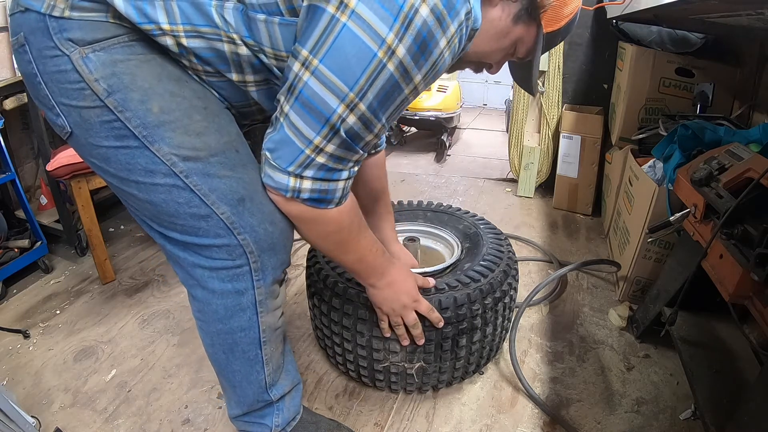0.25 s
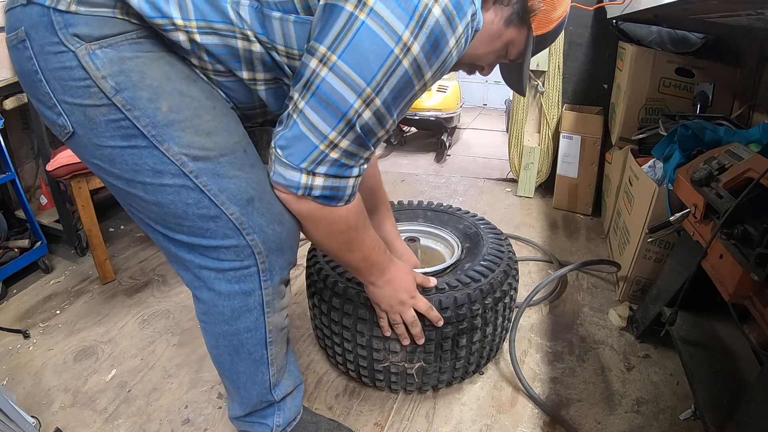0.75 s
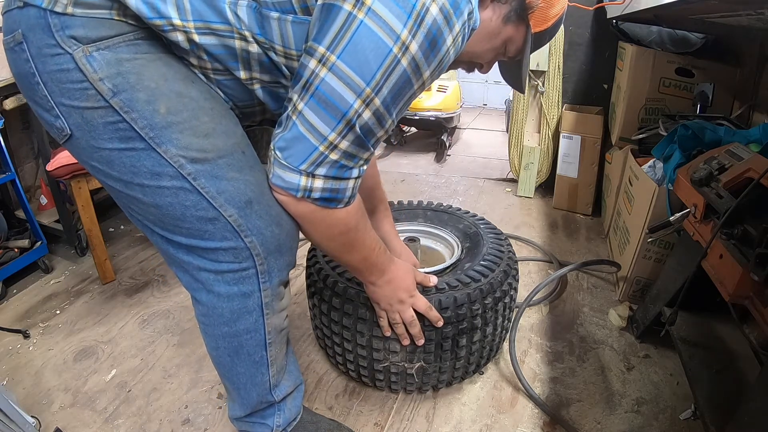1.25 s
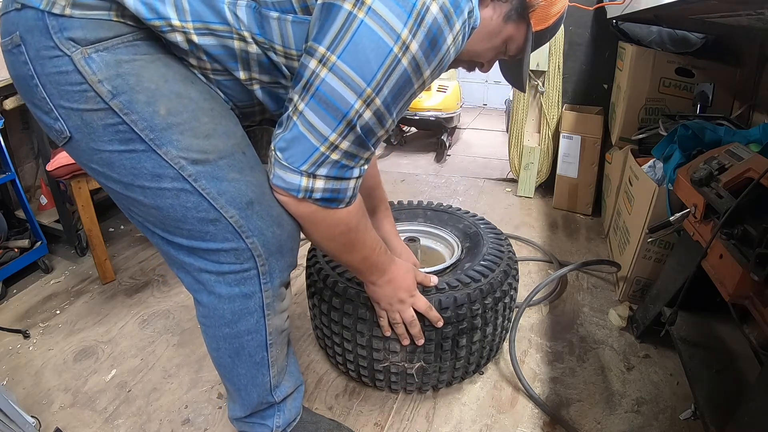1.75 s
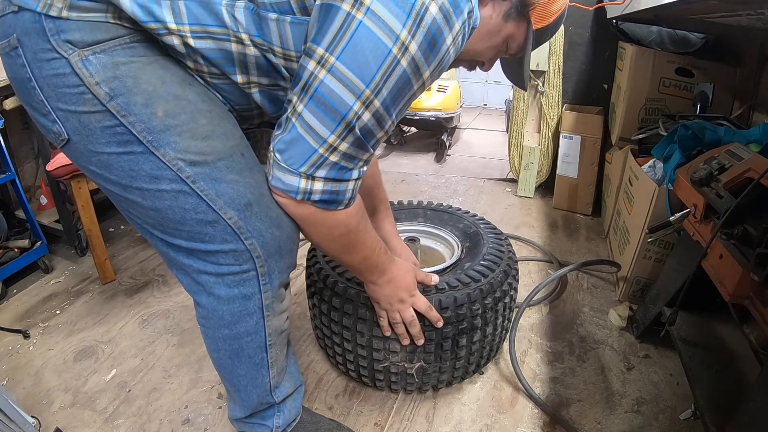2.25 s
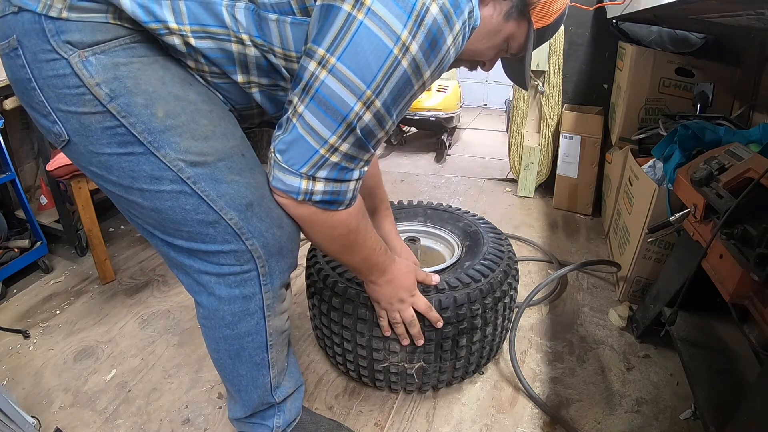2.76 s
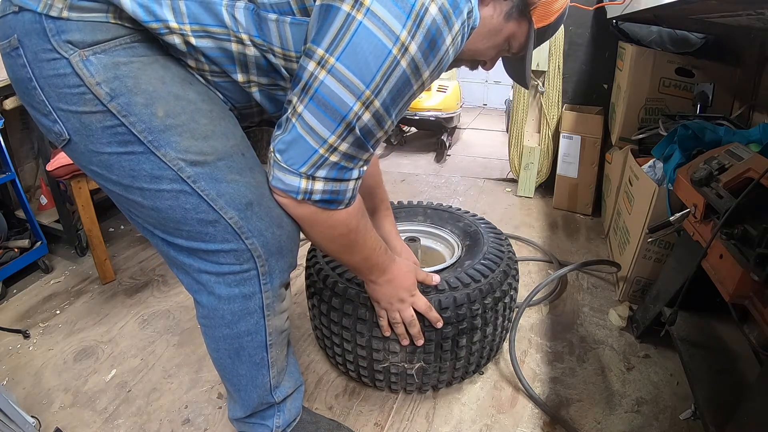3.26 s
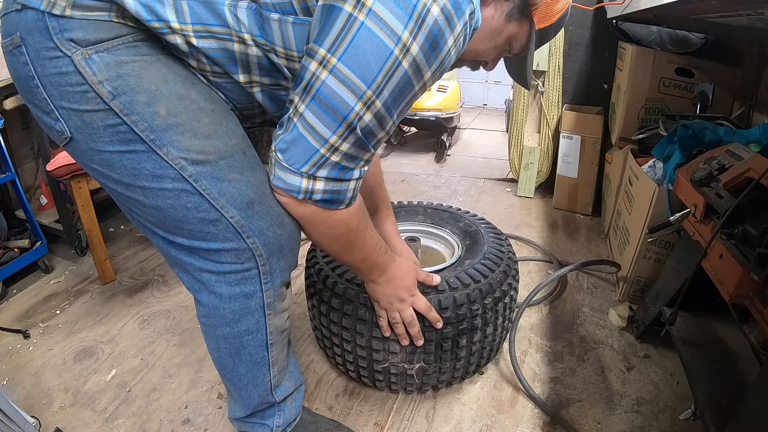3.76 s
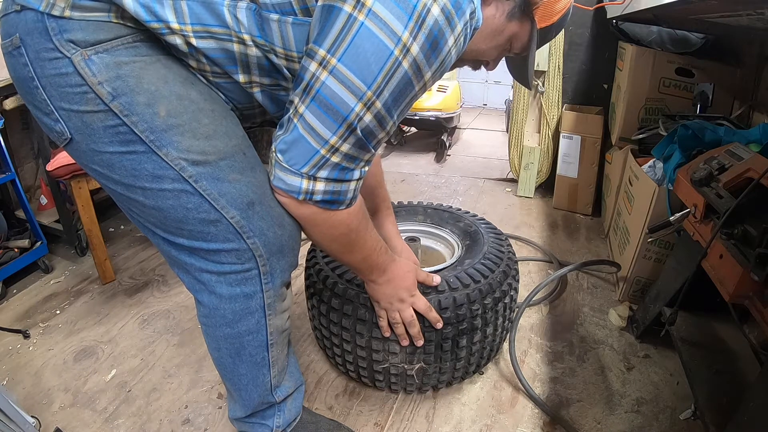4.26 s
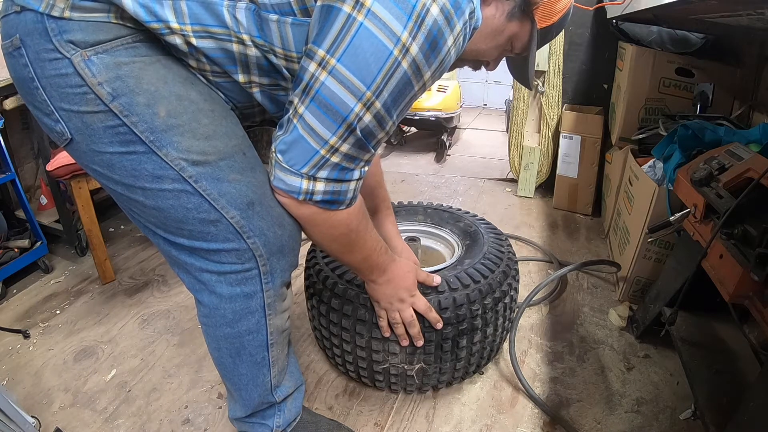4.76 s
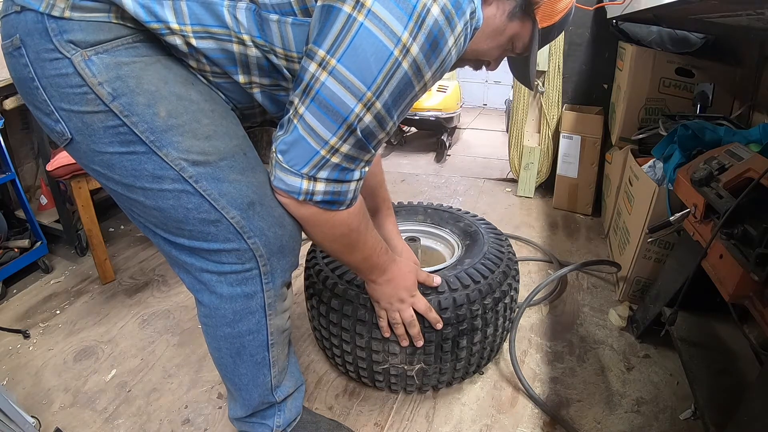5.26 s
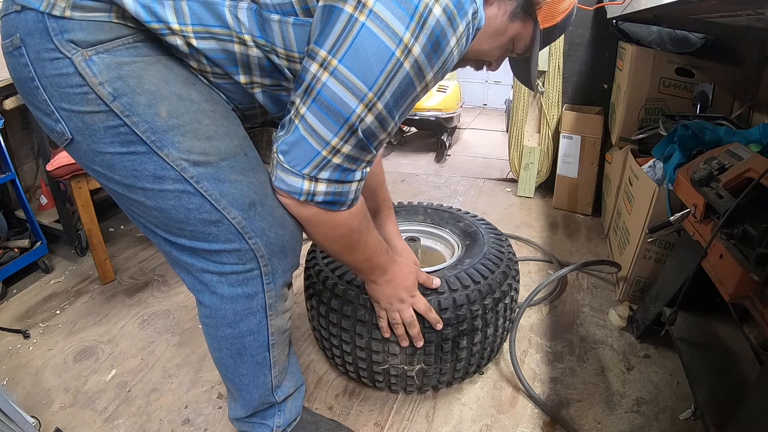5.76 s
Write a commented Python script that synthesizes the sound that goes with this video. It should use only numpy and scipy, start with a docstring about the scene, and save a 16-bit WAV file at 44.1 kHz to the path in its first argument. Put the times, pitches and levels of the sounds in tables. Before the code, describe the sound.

Low, buzzing compressor chug with a rough airy escape and breathy whistles that die away in steps, leaving fine valve hiss and steady motor hum.

```python
"""A compressor drone fills the garage, with a broad rush of air that dies away in steps and a hiss on the right.
The piston at the back gives steady overtones; their scatter rumbles in the room's resonances, with panel and fan.
Air runs through a hose into a small tyre: filtered noise makes the valve hiss, the escaping air and breathy notes.
Soft knocks, decaying sines, come as the tyre seals. Two close microphone ports hear it all."""
import sys
import numpy as np
from scipy import signal
from scipy.fft import rfft, irfft, next_fast_len
from scipy.io import wavfile
from scipy.ndimage import uniform_filter1d

SR = 44100
rng = np.random.default_rng(int(sys.argv[2]) if len(sys.argv) > 2 else 0)


def dump_mix(stems):
    """Bounce the given channels to the path in sys.argv[1] as a 16-bit WAV at rate SR."""
    frames = np.atleast_2d(stems).T  # one column per channel
    limited = np.clip(frames, -1, 1)  # hard clip at full scale
    pcm = np.round(limited * 32767).astype(np.int16)
    wavfile.write(sys.argv[1], SR, pcm)


N = 264996
SIZE = next_fast_len(N, True)
TIME = np.arange(N) / SR
HZ = np.fft.rfftfreq(SIZE, 1 / SR) + 1e-3  # the offset keeps logarithms finite


def compressor():
    """Piston strokes, their rumble in the garage, a ringing panel and the fan sound together."""
    return strokes() + rumble() + panel() + fan()


# Drifting speed of the piston: start_s, strokes_per_s
SHAFT_SPEED = [(0, 31.5), (1.9, 31.48), (3.7, 31.58), (4.5, 31.55), (4.9, 31.48), (6.01, 31.52)]


def crank():
    """Crank angle in radians, the running sum of the shaft speed."""
    start_rad = 3.1
    return start_rad + 2 * np.pi * np.cumsum(curve(SHAFT_SPEED)[0]) / SR


# Overtones of the piston at the ports: multiple_of_stroke_rate, left_level_db, right_level_db
STROKE_OVERTONES = [(1, -29.5, -30.5), (2, -36.7, -32.2), (3, -42.9, -52.9), (4, -58.1, -43.1),
                    (5, -30.6, -31.5), (6, -48.2, -49.0), (7, -44.4, -44.5), (8, -38.2, -37.1),
                    (9, -47.1, -46.2), (10, -61.9, -56.2), (11, -65.7, -59.6), (12, -57.2, -52.3),
                    (13, -64.1, -58.0), (15, -66, -64.5), (16, -68, -59.0), (17, -67, -66),
                    (18, -71.4, -62.2), (19, -58.5, -58.6), (20, -69.7, -66.3), (21, -56.5, -55.0),
                    (22, -64.2, -60.8)]


def strokes():
    """Steady overtones of the piston; higher ones arrive later through intake and room."""
    lag_rad = 1.771  # per multiple squared
    swing_hz, swing_width_hz, swing_rad = 209, 28, 1.9  # overtones near a garage resonance run ahead
    waver_db = .4  # slow unevenness of each overtone
    mean_rate = curve(SHAFT_SPEED)[0].mean()
    turn, out = crank(), 0
    for multiple, left_db, right_db in STROKE_OVERTONES:
        hz = multiple * mean_rate
        left_lead = on_hz(PORT_PAIR, hz)[0]
        swing = swing_rad * np.exp(-((hz - swing_hz) / swing_width_hz) ** 2)
        phase = multiple * turn - lag_rad * multiple ** 2 + swing
        tone = np.cos(phase + np.array([[left_lead], [0]]))
        level = np.sqrt(2) * undb([[left_db], [right_db]])  # rms to peak
        out = out + level * undb(waver_db * walk(3.23)) * tone
    return out


# Garage resonances: pitch_hz, width_hz, level_db (per Hz), left_minus_right_db
GARAGE_MODES = [(36, 15, -53.5, 1), (70.8, 10.4, -52, -3.5), (101, 11.6, -58.5, 8), (134.5, 19, -56.5, 1.5),
                (173, 14, -67, 3), (189, 13, -63, 4), (204.4, 7.3, -61, 2), (218.6, 8.8, -56.5, 6.5),
                (240, 15, -70, 4), (262.2, 8.5, -65, -3), (276.1, 9.3, -58.5, -3.5), (302, 21, -69, -11.5),
                (328, 12, -73.5, -15), (339, 26, -63.5, -4.5), (353, 9.8, -62, -2.5),
                (376.7, 8.1, -57.5, -2), (388.2, 11, -58, -4), (410.5, 10.6, -57, 2.5),
                (439.3, 6.2, -59.5, -2), (456, 8.8, -58.5, -1), (489, 4.7, -66, -6),
                (508.4, 3.2, -57.5, -1.5), (538, 23, -69, -2.5), (565, 15, -75, -7.5)]


def rumble():
    """The uneven part of the strokes, as noise in the garage's resonances."""
    return noise(power(modes=GARAGE_MODES)) * undb(.5 * walk(6))


# Modes of the ringing panel: pitch_hz, width_hz, relative_level_db, left_minus_right_db
PANEL_MODES = [(648, 10, -9, 2), (661, 8, -2, 2), (678, 9, -5, -1), (688, 7, 2, -1), (706, 8, 5, -2),
               (727, 8, 1, -2), (748, 24, -5.5, -2.2), (772, 22, -12, -2), (821, 10, -11, -2)]


def panel():
    """Noise through the casing's modes; the ring swells and dips at random."""
    level_db, waver_db, hold_s = -52.5, .5, .2
    ring = steady(unit(noise(power(modes=PANEL_MODES))), hold_s)
    return ring * undb(level_db + waver_db * walk(4.3))


# Motor and fan noise: pitch_hz, level_db (per Hz)
FAN_SPECTRUM = [(250, -103), (520, -67.5), (900, -81), (1400, -86), (2500, -99), (4000, -106), (5000, -101),
                (8000, -104), (16000, -125)]
# Resonances of the fan shroud: pitch_hz, width_hz, level_db (per Hz)
SHROUD_MODES = [(888, 25, -79), (1008, 20, -77), (1362, 12, -77), (1540, 27, -81), (2150, 66, -86),
                (2420, 30, -86), (3210, 50, -92), (3460, 120, -94), (3920, 80, -94)]


def fan():
    """Broad motor and fan noise with the shroud's resonances on top."""
    return noise(power(FAN_SPECTRUM, SHROUD_MODES)) * undb(1.1 * walk(9))


# Colour of the escaping air: pitch_hz, relative_level_db (per Hz)
RUSH_SPECTRUM = [(700, -5), (1100, -5.5), (2000, -9.5), (3500, -14.5), (4200, -22), (6000, -16.5),
                 (8000, -17.5), (10000, -21), (13000, -28.5), (16000, -38)]
# Levels of the jet as the gap at the rim closes: start_s, low_level_db, middle_level_db, high_level_db
GAP_STEPS = [(0, -47.5, -53.5, -54), (.22, -46, -56.5, -53.5), (.55, -50, -65.5, -56),
             (1.85, -53.5, -73, -57), (2.7, -55.5, -71, -67)]


def rush():
    """Air escaping at the rim in three noise bands; the upper two lean right."""
    split_hz, pan_share = (4140, 4560), .86  # this wider source is shaded less than the valve
    step_s = .17  # time scale of each glide between levels
    low_db, middle_db, high_db = steps(GAP_STEPS, step_s)
    over_low, over_high = (1 / (1 + (hz / HZ) ** 8) for hz in split_hz)
    leaning = power(RUSH_SPECTRUM, pan_db=pan_share * on_hz(LEFT_SHADE)[0])
    low = unit(noise(power(RUSH_SPECTRUM) * (1 - over_low)))
    middle = unit(noise(leaning * over_low * (1 - over_high)))
    high = unit(noise(leaning * over_high))
    low = low * undb(low_db + .9 * walk(14))
    middle = middle * undb(middle_db + 1.7 * walk(8.3))
    high = high * undb(high_db + .42 * walk(17))
    return low + middle + high


# Resonances of chuck and valve stem: pitch_hz, width_hz, relative_level_db
STEM_MODES = [(4310, 60, -12), (4430, 60, -15), (5415, 60, -3), (5510, 40, -9), (6060, 40, -3),
              (6280, 90, -1), (6710, 110, 0), (6900, 21, -1), (7320, 60, 1), (7570, 99, -2), (7890, 50, -6),
              (8600, 170, -8), (9480, 52, -12), (10400, 220, -17), (11900, 400, -15), (12700, 68, -15),
              (13200, 57, -23)]
# Smooth hiss under the resonances: pitch_hz, relative_level_db (per Hz)
HISS_BED = [(3500, -47), (5000, -20), (5800, -4), (6500, -27), (7100, 1), (7850, 0.5), (8250, -10.5),
            (9500, -10.5), (11200, -37), (12200, -49), (14000, -53), (16000, -57)]
# Shading of the left port: pitch_hz, left_minus_right_db
LEFT_SHADE = [(4000, -5), (4700, -11), (5400, -11), (6200, -12), (6900, -12), (7300, -6), (7850, -3),
              (8200, -8), (10000, -7), (12000, -5), (14000, -2)]
# A stem resonance that comes up as the tyre fills: pitch_hz, width_hz, relative_level_db
LATE_STEM_MODE = (4690, 72, -8)
# Its rise: start_s, relative_level_db
LATE_STEM_STEPS = [(0, -7), (3.4, 0)]


def valve():
    """Air squeezing through chuck and stem hisses on fixed bands, each swelling alone, to the right."""
    level_db, start_db, build_s = -53, -1.5, .81  # the hiss builds up as the leak lessens
    ring_db, patchy_db = 5, 1.1  # resonances over the bed, and their swelling
    late_step_s = .5
    white, pan_db = ports(), on_hz(LEFT_SHADE)[0]
    hiss = noise(power(HISS_BED, pan_db=pan_db))
    for mode in STEM_MODES:
        ring = noise(power(modes=[mode], pan_db=pan_db), white)
        hiss = hiss + ring * undb(ring_db + patchy_db * walk(3.2))
    late_ring = noise(power(modes=[LATE_STEM_MODE], pan_db=pan_db), white)
    hiss = hiss + late_ring * undb(ring_db + steps(LATE_STEM_STEPS, late_step_s)[0])
    build_db = start_db * np.exp(-TIME / build_s)
    return unit(hiss) * undb(level_db + build_db + .35 * walk(10))


# Notes of the hollow of tyre and rim as the gap closes:
# start_s, end_s, pitch_hz, width_hz, level_db, left_minus_right_db
HOLLOW_NOTES = [(0, 1.8, 2545, 30, -64.5, 5), (.08, .52, 1955, 14, -58, 2), (0, .3, 1515, 18, -56, 2),
                (.03, .12, 3510, 40, -54, 0), (.1, .52, 1352, 26, -53, 0), (.15, .5, 1290, 50, -56, 0),
                (.1, .5, 8700, 260, -63, -3), (.18, .5, 2200, 40, -61, 3), (.03, .19, 1855, 12, -60, 0),
                (.3, .62, 1850, 16, -55.5, 0), (.44, .63, 1080, 24, -62, 0), (.6, .76, 1010, 24, -62, 0),
                (.3, 1.3, 2110, 50, -63, 0), (.62, 1.4, 1312, 50, -56, .5), (.6, 1.15, 3580, 30, -65, -3),
                (.8, 1.75, 1420, 40, -61, -1), (.82, .94, 1855, 14, -57, -6),
                (1.08, 1.2, 1855, 14, -57, -6), (.75, 1.1, 3065, 34, -63, -2),
                (.8, 1.45, 2835, 34, -63.5, -2), (.6, 1.6, 3950, 50, -70, -3), (.6, 1.8, 2320, 70, -67, 0),
                (0, .5, 4870, 50, -66, -8), (.1, .5, 6050, 200, -60, -9), (0, .5, 7750, 50, -66, -4),
                (.1, .5, 3260, 80, -63, 0), (.2, .55, 2650, 120, -61, 2), (1.2, 1.8, 1690, 110, -57.5, -3),
                (1.38, 1.84, 1295, 40, -55, .5), (1.86, 2.12, 1310, 60, -61, .5),
                (1.8, 2.6, 1620, 150, -63, -3), (5.4, 6.1, 2150, 70, -69, 0)]


def whistles():
    """Narrow bands of noise make breathy notes that wander in pitch and fade in and out."""
    rise_s, fall_s, fade_share = .054, .029, .12  # long notes fade over this share of their length
    hold_s, patchy_db = .09, 1.5  # slow swells are evened out, then each note breaks up on its own
    wander = .0035  # pitch spread as a share
    out, white = 0, ports()
    for start, end, hz, width, db, pan_db in HOLLOW_NOTES:
        fade = fade_share * (end - start)
        opening = np.tanh((TIME - start) / max(rise_s, fade))
        closing = np.tanh((TIME - end) / max(fall_s, fade))
        gate = (opening - closing).clip(0) / 2
        note = steady(unit(noise(power(modes=[(hz, width, 0, pan_db)]), white)), hold_s)
        played = np.cumsum(1 + wander * walk(14)) / SR  # read a little faster or slower
        bent = np.array([np.interp(played, TIME, port) for port in note])
        out = out + bent * gate * undb(db + patchy_db * walk(22))
    return out


# Soft knocks as the tyre settles on the rim: start_s, relative_level_db, upper_modes_db (added above the first)
KNOCKS = [(2.671, -21, 0.5), (2.751, -26, -9), (2.826, -22, -12.5)]
# Low modes of the tyre: pitch_hz, relative_level_db, decay_s, opposed (0 = in step at the ports, 1 = opposed)
TYRE_MODES = [(66.6, 2.2, 0.021, 0.11), (104, -1, 0.089, 0.58), (224, -0.78, 0.019, 0.23)]


def thumps():
    """Each knock swells quickly and rings out on the tyre's low modes."""
    rise_s = .0055
    out, age = np.zeros((2, N)), TIME[:SR // 2]
    for start, knock_db, upper_db in KNOCKS:
        at = int(start * SR)
        for k, (hz, db, decay, opposed) in enumerate(TYRE_MODES):
            level = undb(knock_db + db + upper_db * (k > 0))
            swell = (1 - np.exp(-(age / rise_s) ** 2)) * np.exp(-age / decay)
            ring = np.sin(2 * np.pi * hz * age + np.pi * opposed * np.array([[0], [1]]))
            out[:, at:][:, :len(age)] += level * swell * ring
    return out


# The two microphone ports: pitch_hz, left_lead_rad, likeness (0-1)
PORT_PAIR = [(35, 0, .99), (63, -.4, .92), (90, -.4, .75), (130, -.5, .65), (160, -.5, .96),
             (290, -1.0, .97), (350, -2.0, .93), (520, -3.1, .97), (700, -3.9, .97), (1000, -4.2, .95),
             (2000, -4.8, .86), (4000, -5.8, .7), (4800, -6.3, .5), (5300, -8.9, .55), (8000, -10.1, .4),
             (12000, -12.3, .5)]


def ports():
    """Spectra of white noise at the two ports: partly alike, the left shifted in phase."""
    lead, alike = on_hz(PORT_PAIR)
    alike = np.clip(alike, 0, 1)
    shared, separate = rfft(rng.standard_normal((2, SIZE))) * np.sqrt(SR / 2)
    left = alike * shared + np.sqrt(1 - alike ** 2) * separate
    return np.array([left * np.exp(1j * lead), shared])


def power(spectrum=(), modes=(), pan_db=0):
    """Left and right power per Hz of a smooth spectrum plus steep resonances."""
    sides = np.array([[1], [-1]])
    out = undb(2 * on_hz(spectrum)[0]) if spectrum else 0 * HZ
    out = out * np.ones((2, 1))
    for hz, width, db, *pan in modes:
        peak = undb(sum(pan) * sides) * undb(2 * db)
        out = out + peak / (1 + ((HZ - hz) / width) ** 2 * 1.66) ** 2  # half power at the given full width
    return out * undb(pan_db * sides)


def noise(density, white=None):
    """Noise of that power per Hz at the two ports, from fresh or given white spectra."""
    return irfft((ports() if white is None else white) * np.sqrt(density), SIZE)[:, :N]


def unit(pair):
    """Scales a pair so that the mean of its ports has rms 1."""
    return pair / np.std(pair.mean(axis=0))


def steady(pair, hold_s):
    """Evens out the swells of a pair of rms 1 that last longer than hold_s."""
    swell = uniform_filter1d(pair.mean(axis=0) ** 2, int(hold_s * SR))
    return pair / np.sqrt(.85 * swell + .05)


def walk(rate):
    """Random levels held 1 / rate s and smoothed twice; spread near 1."""
    k = int(SR / rate)
    held = np.repeat(rng.standard_normal(N // k + 1), k)
    return 1.3 * uniform_filter1d(uniform_filter1d(held, k), k)[:N]


def steps(table, blur_s):
    """Columns that glide from one row's value to the next around the given times."""
    rows = np.array(table, float)
    passed = (1 + np.tanh((TIME - rows[1:, :1]) / blur_s)) / 2
    return rows[0, 1:, None] + np.diff(rows[:, 1:], axis=0).T @ passed


def curve(table):
    """Columns of a time table, sample by sample."""
    s, *columns = np.transpose(table)
    return [np.interp(TIME, s, c) for c in columns]


def on_hz(table, hz=HZ):
    """Columns of a frequency table on a log axis."""
    f, *columns = np.transpose(table)
    return [np.interp(np.log(hz), np.log(f), c) for c in columns]


def undb(db):
    """Decibels to gain."""
    return np.exp(np.asarray(db, float) * np.log(10) / 20)


def scene():
    """Everything at the two ports."""
    return compressor() + rush() + valve() + whistles() + thumps()


def record(dry):
    """The microphone channel rolls off the deepest bass and cuts the top steeply."""
    bass_cut_hz, top_hz = 13, 15680
    bass_cut = signal.butter(2, bass_cut_hz, "high", fs=SR, output="sos")
    top_cut = signal.ellip(14, .2, 90, top_hz, fs=SR, output="sos")
    return signal.sosfilt(top_cut, signal.sosfiltfilt(bass_cut, dry))


dry = scene()
out = record(dry)
dump_mix(out)
```